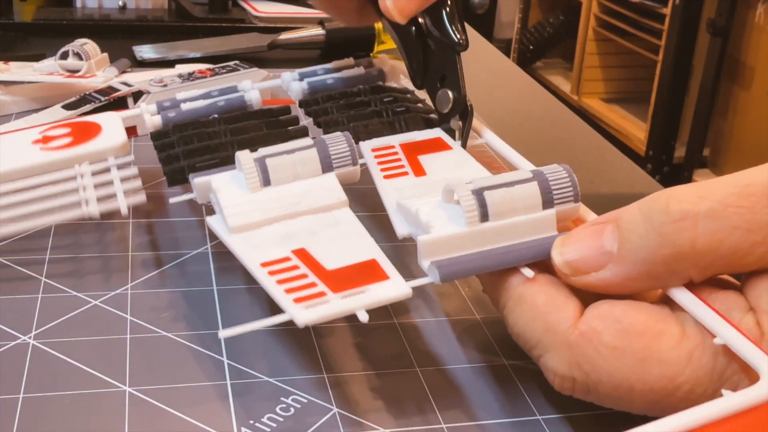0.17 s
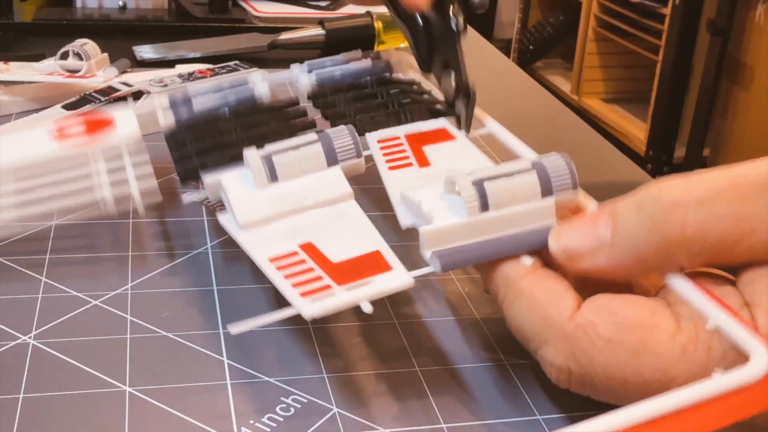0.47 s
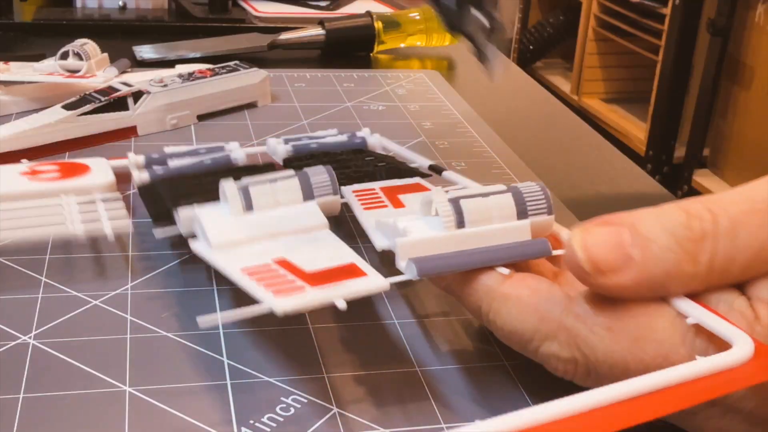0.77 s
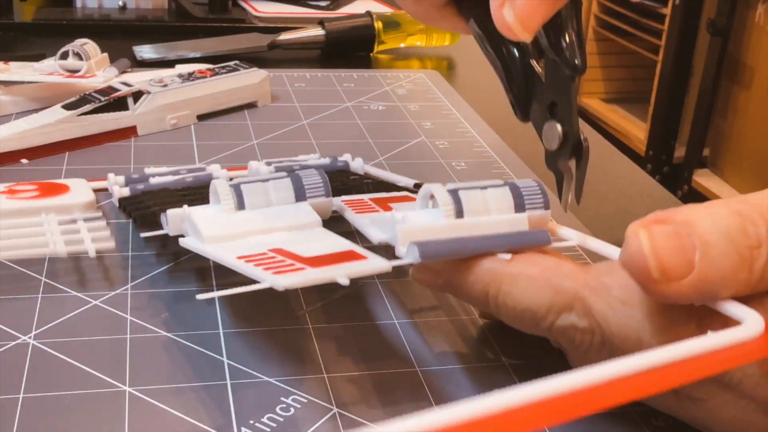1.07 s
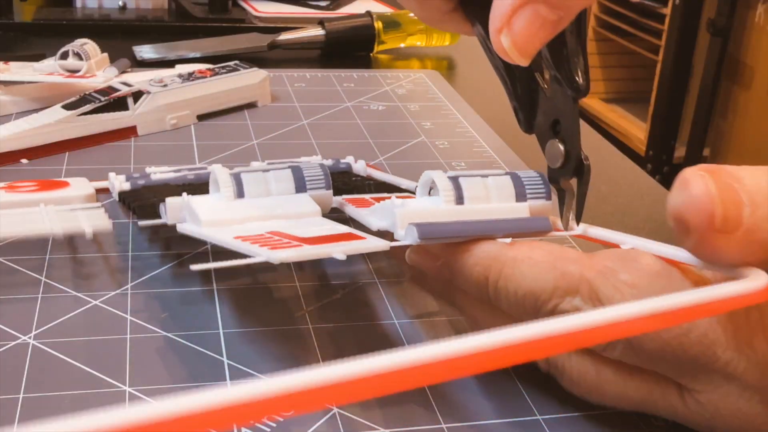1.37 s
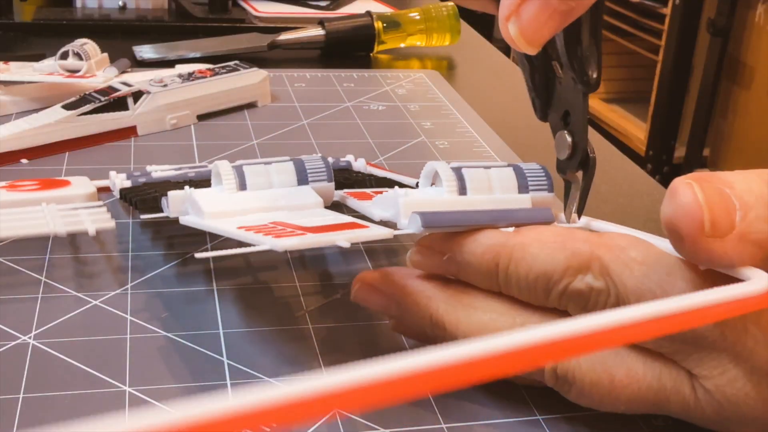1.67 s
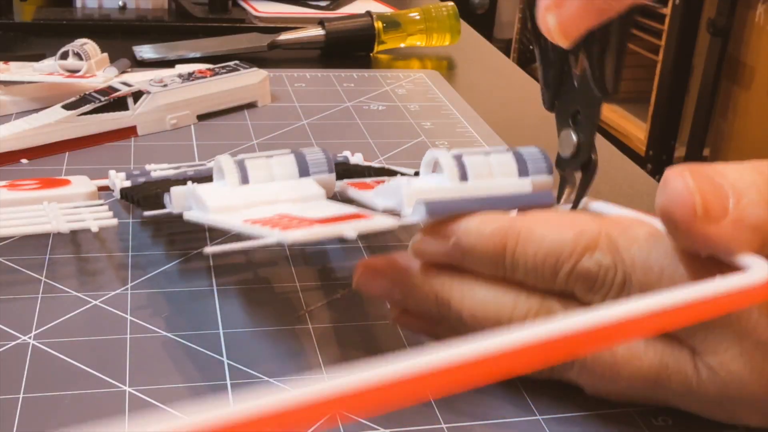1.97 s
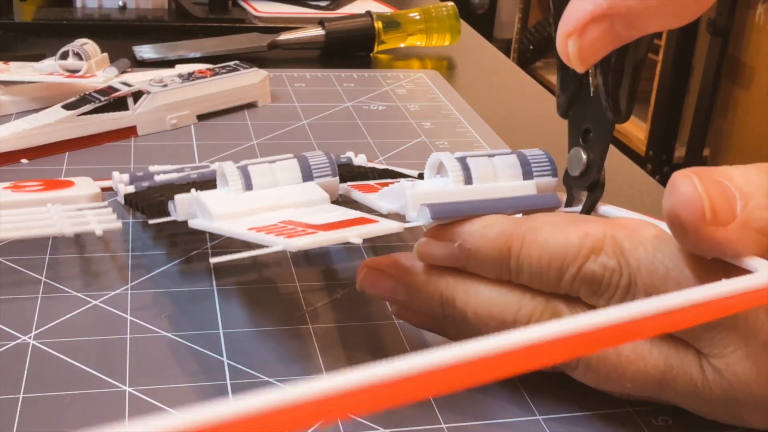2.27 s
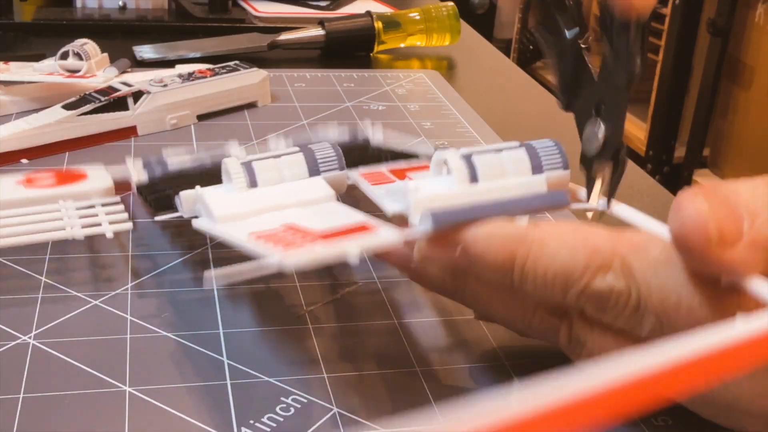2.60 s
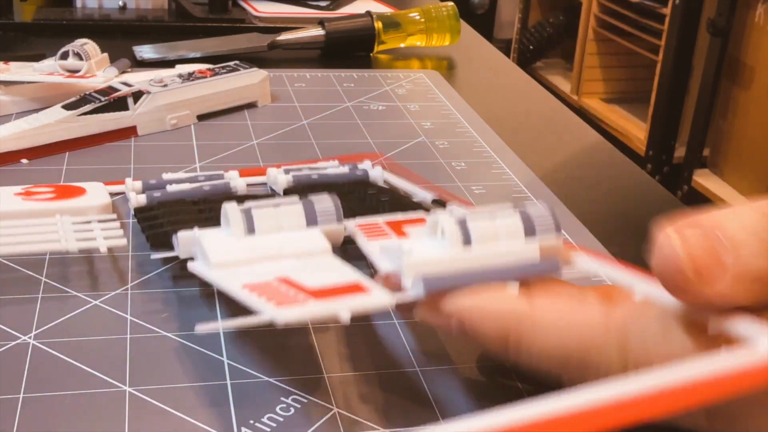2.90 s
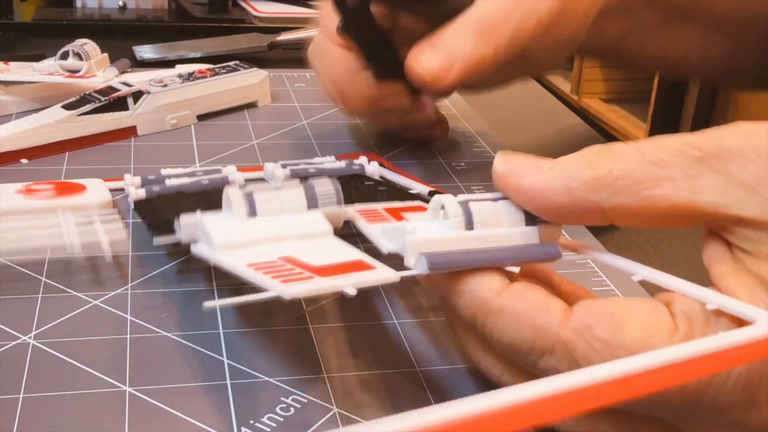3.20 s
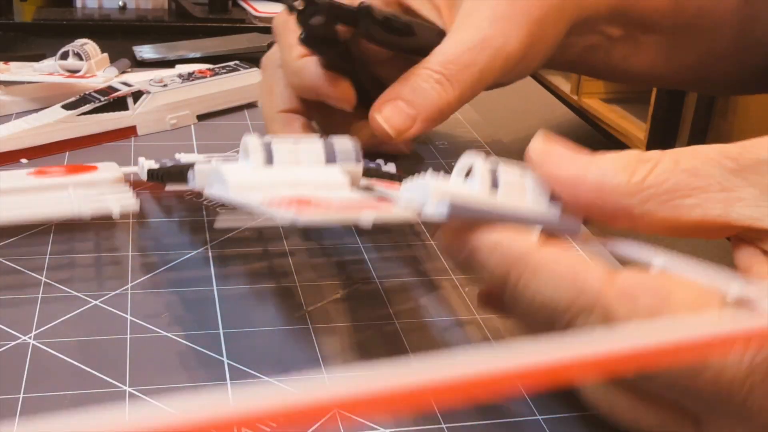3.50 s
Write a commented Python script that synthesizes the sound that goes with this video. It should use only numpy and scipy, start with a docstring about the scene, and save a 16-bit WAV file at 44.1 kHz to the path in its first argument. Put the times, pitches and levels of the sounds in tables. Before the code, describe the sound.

Flush cutters snip a plastic part: one sharp, bright snap at 0.3 s with a short room echo. Plastic ticks and rubs cluster at 0.4-0.7 s; a tight burst of clicks with a thin squeak comes at 1.0 s. Sparse, faint contacts until 2.0 s, handling from 2.4 s, a softer tick-and-thud cut at 2.8 s, then light rubs and taps to 3.6 s. Quiet fan hum and low rumble throughout, slightly dull treble.

```python
"""Snipping a plastic part

Flush cutters snip a plastic model part off its sprue, over a table in a small room: one sharp snap of
ringing modes and noise, later a soft cut made of a tick and a thud. In between, jaws and plastic tick
(noise bursts and ringing modes), scrape (runs of tiny slips) and squeak (wavering sines), and fingers rub
and bump the frame. A fan (shaped noise and steady tones) hums behind a low room rumble."""
import sys
import numpy as np
from scipy import signal
from scipy.fft import rfft, irfft, next_fast_len
from scipy.io import wavfile
from scipy.ndimage import map_coordinates

SR = 44100
rng = np.random.default_rng(int(sys.argv[2]) if len(sys.argv) > 2 else 0)


def wav_out(sig):
    """Save sig, one row per channel (or a flat mono array), as 16-bit PCM at SR to the path in sys.argv[1]."""
    wavfile.write(sys.argv[1], SR, np.round(np.clip(np.atleast_2d(sig).T, -1, 1) * 32767).astype(np.int16))


N = 160965  # scene length in samples
TOP_HZ = 7300  # upper edge of the whole sound


def amp(db):
    """Decibels to gain."""
    return 10 ** (np.asarray(db) / 20)


def unit(x):
    """Scale to rms 1."""
    return x / np.sqrt(np.mean(x ** 2) + 1e-20)


def along(points, hz):
    """Read a curve of (Hz, value) points on a log frequency axis."""
    point_hz, value = np.transpose(points)
    return np.interp(np.log(hz + 1), np.log(point_hz + 1), value)


def filtered(x, response):
    """Multiply the spectrum of x by a gain that depends on frequency."""
    size = next_fast_len(len(x) + 8192)
    spectrum = rfft(x, size) * response(np.fft.rfftfreq(size, 1 / SR))
    return irfft(spectrum, size)[:len(x)]


def coloured(x, colour, tilt=0):
    """Shape x with a spectral curve and a tilt in dB per octave, at rms 1."""
    def response(hz):
        octaves = np.log2(np.clip(hz, 300, TOP_HZ) / TOP_HZ)
        return amp(along(colour, hz) + tilt * octaves) * (hz < TOP_HZ)
    return unit(filtered(x, response))


def fade(t, t60):
    """Exponential decay, down 60 dB after t60 seconds."""
    return np.exp(-np.log(1000) * t / t60)


def wobble(rate, size=N):
    """A smooth random curve through rate knots a second."""
    knots = rng.standard_normal(1024)
    return map_coordinates(knots, [np.arange(size) / SR * rate], mode="wrap")


def add(out, s, x):
    """Mix x in at time s."""
    i = max(round(s * SR), 0)
    out[i:i + len(x)] += x[:max(N - i, 0)]


# spectrum of the fan noise: freq_hz, level_db
FAN_COLOUR = [(41, -48.5), (70, -8), (122, -3), (333, -11), (367, -8), (463, -5), (561, -14.5), (630, -18),
              (763, -9.5), (809, -17.5), (1360, -13), (1560, -19), (7000, -35.5), (9100, -96)]
# tones of the fan hum: pitch_hz, level_db (rms)
HUM_TONES = [(119.8, -62.5), (388, -68.5), (655, -68.5), (748, -68), (1244, -76.5)]
# spectrum of the room rumble: freq_hz, level_db
RUMBLE_COLOUR = [(20, -5.5), (30, -3), (39, 0.5), (50, -18), (70, -16.5), (150, -54.5), (400, -94)]
# shape of the rumble's swell, centred and scaled before use: time_s, contour_db
RUMBLE_CONTOUR = [(0.0, -67), (0.13, -40.5), (0.48, -53), (0.51, -34), (0.76, -57), (1.54, -51),
                  (1.59, -59.5), (1.67, -48.5), (2.33, -56), (2.35, -50.5), (2.76, -54), (2.81, -39.5),
                  (2.93, -43.5), (3.65, -49.5)]
FAN_DB, HUM_WAVER_DB = -54.5, -2.5
RUMBLE_DB, RUMBLE_SWING = -44.5, 0.37  # base level; share of the contour that is heard


def background():
    """Fan noise and hum tones wavering in level and phase, over low noise that sways in level."""
    t = np.arange(N) / SR
    hum = np.zeros(N)
    for hz, db in HUM_TONES:
        level = np.sqrt(2) * amp(db + HUM_WAVER_DB * wobble(3.1))
        hum += level * np.sin(2 * np.pi * hz * t + 0.42 * wobble(5.5))
    contour_db = np.interp(t, *np.transpose(RUMBLE_CONTOUR))
    sway_db = RUMBLE_SWING * (contour_db - contour_db.mean())
    rumble = coloured(rng.standard_normal(N), RUMBLE_COLOUR) * amp(RUMBLE_DB + sway_db)
    fan = amp(FAN_DB) * coloured(rng.standard_normal(N), FAN_COLOUR)
    return hum + fan + rumble


# dull knocks of hand and cutters on the frame: start_s, thud_db, t60_s, ring_hz, ring_db
KNOCKS = [(.005, -45, 0.28, 430, -53), (0.069, -58.5, 0.096, 380, -44.5), (.393, -47, 0.14, 490, -38.5),
          (1.032, -42.5, 0.11, 662, -52), (2.0, -50, 0.18, 632, -49.5), (2.421, -41, 0.13, 260, -50.5),
          (2.437, -61, 0.092, 1239, -40.5), (2.444, -61.5, 0.11, 853, -44.5),
          (2.794, -38, 0.15, 383, -41.5), (2.89, -43.5, 0.29, 519, -50.5), (3.17, -47, 0.47, 530, -65),
          (3.351, -53, 0.15, 400, -49), (3.46, -45, 0.12, 390, -52)]
# spectrum of the thud: freq_hz, level_db
THUD_COLOUR = [(40, 0.5), (100, 0), (150, 0.5), (210, -0.5), (290, -9), (400, -5), (600, -9.5), (900, -16),
               (2000, -33), (5000, -36.5)]
BUMP_ATTACK_S = 0.0033


def bumps():
    """Soft knocks: a low thud and one hollow note of the held frame, dying together."""
    out, t = np.zeros(N), np.arange(SR // 2) / SR
    attack = 1 - np.exp(-t / BUMP_ATTACK_S)
    for s, thud_db, t60, hz, ring_db in KNOCKS:
        thud = amp(thud_db) * coloured(rng.standard_normal(len(t)), THUD_COLOUR)
        ring = amp(ring_db) * np.sin(2 * np.pi * hz * t)
        add(out, s, (thud + ring) * fade(t, t60) * attack)
    return out


# plastic sliding under fingers and jaws: start_s, length_s, start_level_db, end_level_db, tilt_db_per_octave
STROKES = [(0.038, 0.035, -50.5, -54, 4.5), (0.439, 0.1, -56, -55, 7), (0.548, 0.061, -60, -52, 2),
           (0.629, 0.097, -50, -60, 0.5), (0.813, 0.18, -56.5, -63, -2.5), (.92, 0.071, -56, -49.5, -2),
           (0.997, 0.031, -47.5, -45, 1.5), (1.34, 0.023, -57, -61.5, -1.5), (1.981, 0.035, -49, -50.5, -2),
           (2.029, 0.12, -56, -60.5, -4), (2.431, 0.023, -41, -48, -3), (2.471, 0.043, -54.5, -59.5, 1),
           (2.55, 0.052, -57.5, -59.5, 0), (2.618, 0.097, -54, -54.5, 3), (2.699, 0.12, -60, -57, 2.5),
           (2.8, 0.14, -54, -56.5, 1), (2.953, 0.18, -59.5, -64, 0.5), (3.113, 0.14, -53.5, -55.5, -1),
           (3.30, 0.17, -58.5, -55.5, -2), (3.452, 0.032, -53.5, -50.5, -1),
           (3.502, 0.11, -66, -55.5, -0.5)]
# spectrum of the sliding: freq_hz, level_db
STROKE_COLOUR = [(100, -11), (400, 7), (900, 4), (1700, -1.5), (2300, 2), (2800, 0), (3350, 3), (4300, -2),
                 (5000, 0.5), (5500, -1), (6500, -1), (7200, -20)]
RUB_EDGE_S = 0.011  # fade in and out of a stroke
SLIPS_PER_S, SLIP_SPREAD_DB, SLIP_T60_S = 1300, 1.5, 0.0053


def rubs():
    """Each stroke is a dense run of tiny slips, each ringing briefly at its own pitch."""
    out, t = np.zeros(N), np.arange(SR // 4) / SR
    age = np.arange(SR // 64)  # samples since a slip began
    for s, length, start_db, end_db, tilt in STROKES:
        when, pitch, size = rng.random((3, int(SLIPS_PER_S * t[-1]), 1))
        level = amp(-SLIP_SPREAD_DB * np.log(size + 0.054))  # few strong slips, many weak
        tone = np.sin(2 * np.pi * pitch * TOP_HZ * age / SR)
        grains = level * fade(age / SR, SLIP_T60_S) * tone
        position = (when * len(t)).astype(int) + age
        slips = np.bincount(position.ravel(), grains.ravel(), len(t))[:len(t)]
        release = np.exp(-np.maximum(t - length, 0) / RUB_EDGE_S)
        gate = np.clip(t / RUB_EDGE_S, 0, 1) * release
        glide = amp(np.interp(t, [0, length], [start_db, end_db]))
        add(out, s, coloured(slips, STROKE_COLOUR, tilt) * gate * glide)
    return out


# ringing modes of the sprue and its parts: pitch_hz, level_db, t60_s
SPRUE_MODES = [(770, 2.5, .07), (1150, -12, 0.067), (1890, -0.5, 0.077), (2258, 8, 0.076),
               (2970, -1, 0.076), (3580, -1.5, 0.07), (4220, -2.5, 0.041), (4650, -5, 0.14),
               (6560, 5.5, 0.056)]
FAVOUR_DB, FAVOUR_WIDTH_HZ = 11, 140


def contact(colour, tilt, t60, ring_db, favoured_hz=0):
    """A short crack, stronger around one pitch that depends on the spot hit, and the sprue's ring."""
    t = np.arange(SR // 2) / SR

    def favour(hz):
        peak = np.exp(-((hz - favoured_hz) / FAVOUR_WIDTH_HZ) ** 2)
        return amp(FAVOUR_DB * (favoured_hz > 0) * peak)

    noise = filtered(rng.standard_normal(len(t)), favour)
    crack = coloured(noise, colour, tilt) * fade(t, t60)
    ring = np.zeros(len(t))
    for hz, db, life in SPRUE_MODES:
        ring += amp(db) * fade(t, life) * np.sin(2 * np.pi * (hz * t + rng.random()))
    return crack + amp(ring_db) * ring


# light contacts of jaws and plastic: start_s, level_db, tilt_db_per_octave, crack_t60_s, favoured_pitch_hz
CONTACTS = [(0.1998, -44.5, 2, 0.062, 2140), (0.416, -47.5, 5, 0.026, 2560), (.533, -42, 0, 0.11, 1270),
            (.536, -38.5, 1.5, 0.027, 5000), (0.5394, -41, 3, 0.062, 3300),
            (0.5882, -36, 13.5, 0.015, 5360), (0.607, -39, 8, 0.018, 3260), (.871, -45.5, 6, 0.05, 2880),
            (1.002, -45.5, 2, 0.044, 3500), (1.0165, -40.5, 4, .025, 3460), (1.0213, -31, 0.5, 0.014, 1940),
            (1.0259, -31.5, 9.5, 0.012, 3420), (1.03, -35.5, -3.5, 0.052, 1350),
            (1.042, -48, 3, 0.023, 4530), (1.315, -45.5, -4, 0.076, 1290), (1.613, -55, 7, 0.033, 3950),
            (1.824, -54, 3.5, .12, 3200), (1.996, -49, -3.5, 0.054, 2230), (2.0136, -40.5, 2, 0.039, 4930),
            (2.185, -47, -4, 0.058, 3820), (2.4222, -39, 3.5, 0.031, 5200),
            (2.438, -45.5, -1.5, 0.097, 1104), (2.4785, -43, -3, .019, 2200),
            (2.6141, -41.5, 10.5, 0.037, 6720), (2.6688, -38.5, 8.5, 0.017, 4950),
            (2.676, -44, 6, .014, 5000), (2.6877, -34.5, 1.5, 0.023, 5000), (2.694, -41, -2.5, 0.027, 3900),
            (2.783, -40.5, 4, 0.024, 2720), (2.7925, -35, 4.5, 0.039, 2130), (2.797, -27, -7, 0.016, 4950),
            (2.813, -43.5, 3, 0.061, 6460), (2.895, -44, 3, .031, 3200), (2.9476, -39, 1.5, 0.026, 3260),
            (3.109, -47.5, 5.5, 0.053, 2360), (3.152, -44.5, 3.5, 0.044, 6000),
            (3.175, -48.5, 4, 0.026, 2190), (3.2449, -39.5, 1, 0.049, 3630),
            (3.2505, -46, -0.5, 0.043, 2230), (3.473, -48.5, 0.5, 0.062, 5030),
            (3.549, -48, -2, 0.062, 2400), (3.6243, -42, -1, 0.08, 2010), (3.629, -45, -3, 0.057, 2030)]
# spectrum of the contacts: freq_hz, level_db
CONTACT_COLOUR = [(100, -8), (400, -1.5), (900, -0.5), (1600, -2.5), (2400, 2), (3600, -2.5), (5000, -4),
                  (7000, -11)]
TICK_RING_DB, TICK_ATTACK_S = -29, 0.0007


def ticks():
    """Small knocks and cracks of the plastic, each a contact with a slightly softened onset."""
    out = np.zeros(N)
    rise = 1 - np.exp(-np.arange(SR // 2) / SR / TICK_ATTACK_S)
    for s, db, tilt, t60, hz in CONTACTS:
        add(out, s, amp(db) * rise * contact(CONTACT_COLOUR, tilt, t60, TICK_RING_DB, hz))
    return out


# the stem breaks, then the jaws meet: start_s, level_db (before the two trims), crack_pitch_factor
SNAP_HITS = [(0.2952, -18, 0.95), (0.2984, -21.5, 1.24), (0.3015, -30, 0.99)]
# spectrum of splinters and echoes: freq_hz, level_db
SPLINTER_COLOUR = [(100, -13), (430, -1), (820, -0.5), (1350, -3.5), (2100, -1), (3600, -0.5), (4600, 2.5),
                   (6400, -4.5), (7200, -8)]
# broad resonances of the break: pitch_hz (before the pitch factor), width_hz, level_db
CRACK_MODES = [(760, 260, -5), (1830, 190, -11), (2410, 310, -3), (3140, 190, 2), (4580, 450, 7.5),
               (6650, 650, 5.5)]
# echoes from the table top, then the room: level_db, t60_s
SNAP_ECHOES = [(-33, 0.14), (-34.5, 0.43)]
CRACK_DB, SPLINTER_DB = -7, -3.5  # trims on each hit's level
SNAP_T60_S, SNAP_RING_DB = 0.017, -19
ECHO_RISE_S, ECHO_GRAIN_DB, ECHO_GRAINS_PER_S = 0.0033, 2.6, 300


def snap():
    """The stem breaks and splinters, the jaws clap shut; table and room answer with grainy echoes."""
    out, t = np.zeros(N), np.arange(SR) / SR
    for s, db, pitch in SNAP_HITS:
        crack = np.zeros(len(t))
        for k, (hz, width, level) in enumerate(CRACK_MODES):
            polarity = (-1) ** k
            decay = np.exp(-np.pi * width * t)  # a broad resonance dies fast
            crack += polarity * amp(level) * decay * np.sin(2 * np.pi * pitch * hz * t)
        add(out, s, amp(db + CRACK_DB) * crack)
        splinter = contact(SPLINTER_COLOUR, 0, SNAP_T60_S, SNAP_RING_DB)
        add(out, s, amp(db + SPLINTER_DB) * splinter)
    for db, t60 in SNAP_ECHOES:
        grain = amp(ECHO_GRAIN_DB * wobble(ECHO_GRAINS_PER_S, len(t)))
        echo = coloured(rng.standard_normal(len(t)) * grain, SPLINTER_COLOUR)
        envelope = fade(t, t60) * (1 - np.exp(-t / ECHO_RISE_S))
        add(out, SNAP_HITS[0][0], amp(db) * echo * envelope)
    return out


# the jaws squeak as they drag on the sprue: middle_s, half_length_s, level_db, pitch_hz
SQUEAK_SWELLS = [(.635, 0.023, -55.5, 3830), (0.684, 0.016, -59.5, 3870), (.722, 0.011, -52.5, 3800),
                 (0.929, 0.017, -57.5, 3880), (0.988, .02, -58.5, 3940), (1.012, 0.012, -45, 3800),
                 (1.028, 0.0067, -37.5, 3904), (1.09, .025, -55.5, 3790), (1.082, 0.032, -62, 4030)]
# modes of the steel jaws: pitch_ratio, level_db
STEEL_MODES = [(1, 0), (.912, -12.5)]
DRAG_CHATTER_DB, CHATTER_PER_S = 2.5, 130  # level waver
SQUEAK_WAVER, WAVER_PER_S = 0.022, 300  # pitch waver, as a fraction of the pitch


def cutters():
    """Uneven friction makes the steel squeak in short swells, wavering in pitch and level."""
    out, t = np.zeros(N), np.arange(SR // 2) / SR
    middle = t[-1] / 2
    for s, half, db, hz in SQUEAK_SWELLS:
        chatter_db = DRAG_CHATTER_DB * wobble(CHATTER_PER_S, len(t))
        swell = np.exp(-((t - middle) / half) ** 2) * amp(db + chatter_db)
        for ratio, mode_db in STEEL_MODES:
            pitch = hz * ratio * (1 + SQUEAK_WAVER * wobble(WAVER_PER_S, len(t)))
            tone = np.sin(2 * np.pi * np.cumsum(pitch) / SR)
            add(out, s - middle, amp(mode_db) * swell * tone)
    return out


# decay of the small room: freq_hz, t60_s
ROOM_DECAY = [(200, 0.52), (800, 0.59), (2500, 0.39), (7000, 0.48)]
ROOM_DELAY_S = 0.0033  # build-up time of the tail


def room(x):
    """The small room's answer: a noise tail with each frequency dying at its own speed."""
    hz, t, bands = signal.stft(rng.standard_normal(SR // 2), SR, nperseg=256)
    decay = fade(t, along(ROOM_DECAY, hz)[:, None])
    tail = signal.istft(bands * decay, SR, nperseg=256)[1]
    tail = tail * (1 - np.exp(-(np.arange(len(tail)) / SR / ROOM_DELAY_S) ** 2))
    return signal.fftconvolve(x, tail / np.linalg.norm(tail))[:len(x)]


CLICK_ROOM_DB, HANDLING_ROOM_DB = -6, -2.5  # sends into the room


def scene():
    """Snap with its own echoes, clicks and handling in the room, over the background."""
    clicks = ticks() + cutters()
    handling = rubs() + bumps()
    wet = room(amp(CLICK_ROOM_DB) * clicks + amp(HANDLING_ROOM_DB) * handling)
    return (snap() + clicks + handling + wet + background())[None]


def record(dry):
    """A very steep low-pass at TOP_HZ closes off the treble."""
    def low_pass(hz):
        return 1 / np.sqrt(1 + (hz / TOP_HZ) ** 120)
    return np.array([filtered(x, low_pass) for x in dry])


dry = scene()
out = record(dry)
wav_out(out)
```